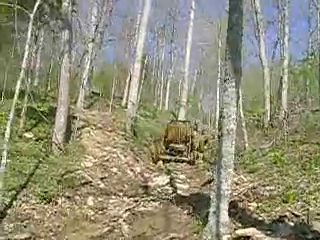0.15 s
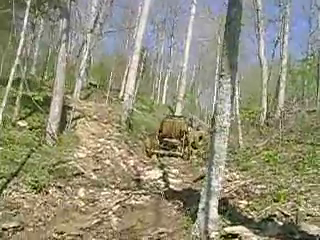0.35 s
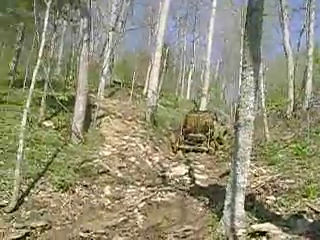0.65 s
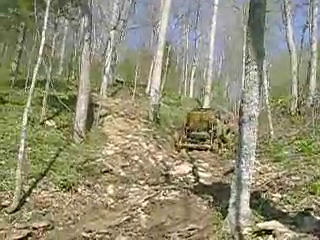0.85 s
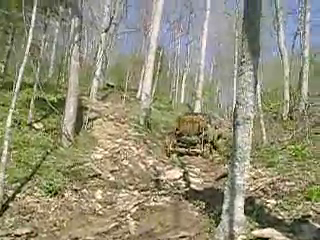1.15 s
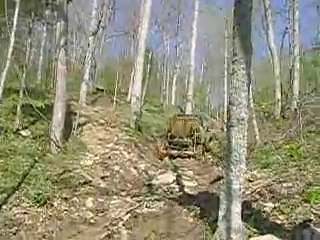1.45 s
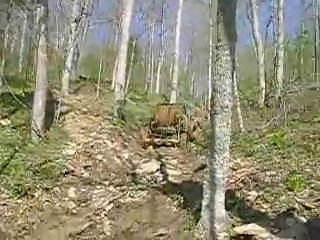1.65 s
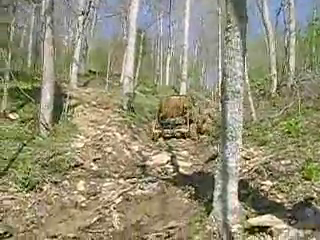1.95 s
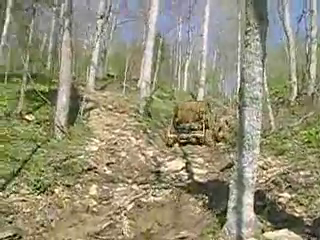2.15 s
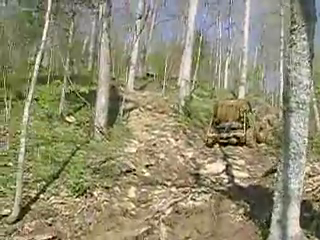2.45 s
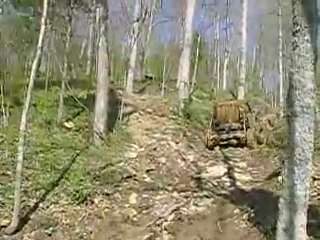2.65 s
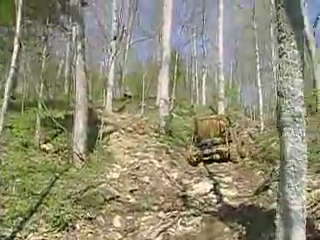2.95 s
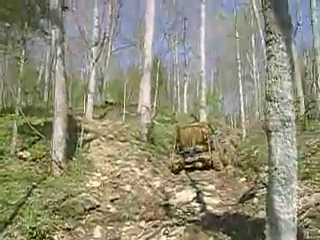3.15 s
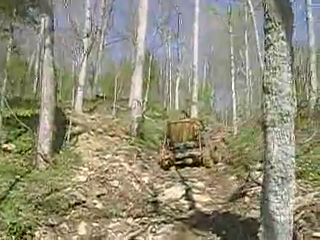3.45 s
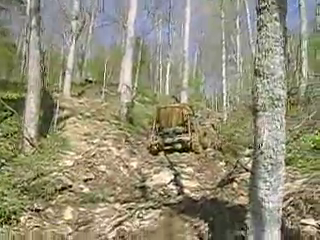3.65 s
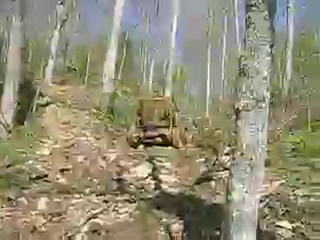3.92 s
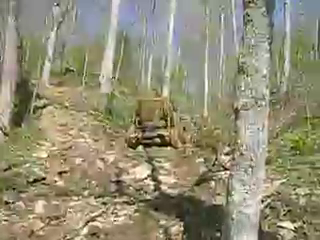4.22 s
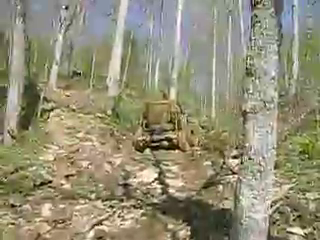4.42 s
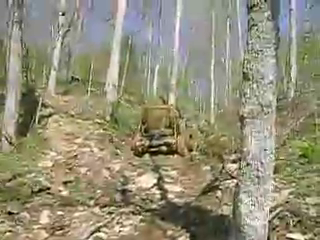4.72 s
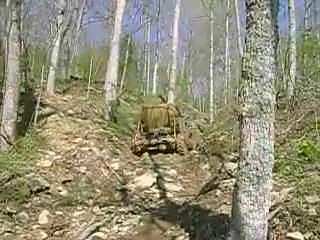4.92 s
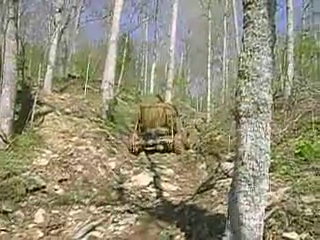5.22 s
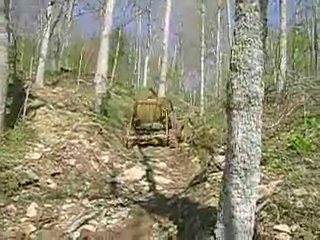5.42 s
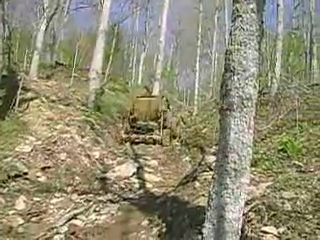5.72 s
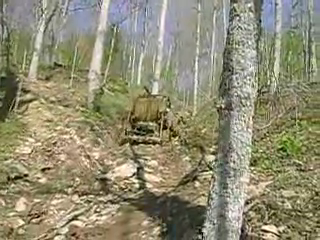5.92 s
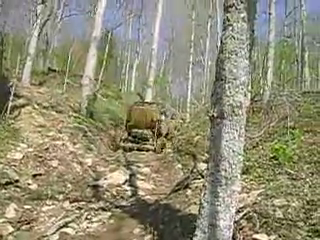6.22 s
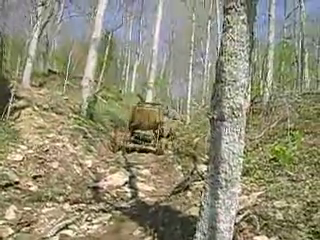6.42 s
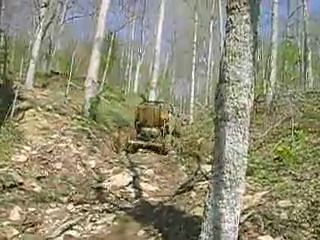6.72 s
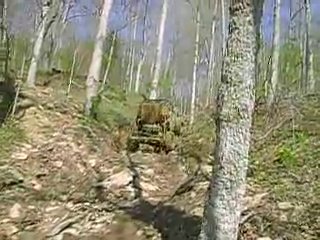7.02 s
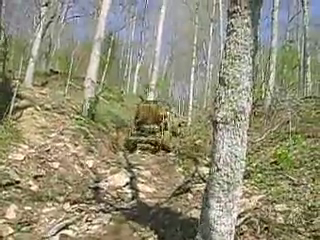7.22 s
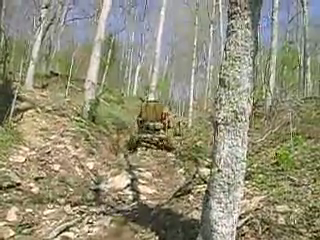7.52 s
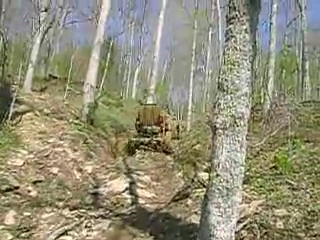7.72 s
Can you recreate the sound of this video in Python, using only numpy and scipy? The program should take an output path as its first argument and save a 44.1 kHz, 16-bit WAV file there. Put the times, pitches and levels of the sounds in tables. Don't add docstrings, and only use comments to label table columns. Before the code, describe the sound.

A small off-road engine on a rocky forest slope slows from a moderate putter to a weak, lumpy idle with a faint belt whistle. A sharp throttle blip comes with hard stone clacks and soft exhaust thumps. It chugs steadily under load, bogs, then climbs in surges to a loud flat-out roar. A cheap, dull mono microphone clips harshly at the end.

```python
import sys
import numpy as np
from scipy import signal
from scipy.fft import rfft, irfft, next_fast_len
from scipy.io import wavfile
from scipy.ndimage import uniform_filter1d

SR = 44100
rng = np.random.default_rng(int(sys.argv[2]) if len(sys.argv) > 2 else 0)


def voltage_ratio(level):
    return 10 ** (np.asarray(level, float) / 20)


def file_out(sig):
    cols = np.atleast_2d(sig).T
    lim = np.clip(cols, -1, 1)
    pcm = np.round(lim * 32767).astype(np.int16)
    wavfile.write(sys.argv[1], SR, pcm)


N = 347049

# (firing rate [Hz], upper orders over the gas [dB], firing unevenness [dB],
# half order [dB], orders one and two [dB])
BY_SPEED = [(30.3, -15, 3.5, -43, -12), (37.5, -9.5, 4, -40.5, -7), (46.2, -6.5, 3, -34, -0.3),
            (70, -2.5, 6.5, -35, -1.05), (86, 1.5, 3, -33.5, -2.2), (117.6, -0.5, -1.2, -44, 1.16),
            (160, 3.5, -1, -30.5, 2), (178, 5, -0.5, -30, 1), (189, -6, 1, -24.5, 0.8),
            (218, 0.5, 5.5, -10, 0.7)]


def rms_one(x):
    return x / np.sqrt(np.mean(x ** 2) + 1e-20)


def in_time(rows):
    s, *columns = np.transpose(rows)
    return [np.interp(np.arange(N) / SR, s, c) for c in columns]


def on_log(points, hz, axis=1):
    points = np.array(points)
    return np.interp(np.log(hz), np.log(points[:, 0]), points[:, axis])


def hump(middle_s, before_s, after_s):
    return np.interp(np.arange(N) / SR, [middle_s - before_s, middle_s, middle_s + after_s], [0, 1, 0])


def resonance(x, hz, width_hz):
    r = np.exp(-np.pi * width_hz / SR)
    b = np.array([1, 0, -1]) * (1 - r * r) / 2
    return signal.lfilter(b, [1, -2 * r * np.cos(2 * np.pi * hz / SR), r * r], x)


def narrow_noise(hz, width_hz, source, second_width_hz):
    return rms_one(resonance(resonance(source, hz, width_hz), hz, second_width_hz))


def coloured(x, points):
    size = next_fast_len(N)
    hz = np.maximum(np.arange(size // 2 + 1) * SR / size, 1)
    return irfft(rfft(x, size) * voltage_ratio(on_log(points, hz)), size)[:N]


def firing_rate():
    # (time [s], firing rate [Hz])
    speed = [(0, 64), (.39, 47.7), (1.0, 38.06), (1.6, 31.85), (2.23, 27.68), (2.51, 65.7), (2.65, 71.6),
             (3.45, 54.3), (3.95, 60.93), (4.8, 54.2), (5.14, 60.2), (5.72, 80.57), (6.13, 115.3),
             (6.42, 121.2), (6.8, 148.6), (7.2, 188.6), (7.62, 215.5), (7.87, 208.5)]
    # (slowest time [s], rate lost [Hz], sinking [s], recovering [s])
    bogs = [
        (3.611, 8.07, .14, 0.36),
        (5.499, 13.93, .36, .22),
        (5.87, 10.1, .15, 0.27),
        (6.52, 17.5, .1, .24),
        (7.44, 11, .24, .14),
    ]
    drag = sum(lost * hump(s, sinking_s, recovering_s) for s, lost, sinking_s, recovering_s in bogs)
    flywheel_s = .05
    return uniform_filter1d(in_time(speed)[0] - drag, size=round(flywheel_s * SR), mode="nearest")


def throttle_stabs():
    # (middle time [s], half length [s], extra gas [dB])
    stabs = [(0.126, 0.051, 2.5), (2.258, 0.006, 6.5), (2.295, 0.013, 3.5), (2.382, 0.13, 10.5),
             (3.519, .07, 5), (3.787, 0.26, 3), (5.475, 0.03, 1), (5.76, 0.073, 3), (5.872, 0.039, 3.5),
             (6.073, 0.11, 5.5), (6.288, 0.1, -2.5), (6.461, 0.049, 3.5), (6.571, 0.096, -0.5),
             (7.256, 0.17, 1.5), (7.573, 0.089, 4)]
    return sum(db * hump(s, half_s, half_s) for s, half_s, db in stabs)


def low_orders(rate, pressure_db):
    # (frequency [Hz], level [dB])
    part_flow = [(30, -13.5), (60, -13.5), (75, -4), (100, 0.5), (118, -2), (135, -5.5), (170, -9),
                 (215, -7.5)]
    full_flow = [(70, -7.5), (120, -2.5), (147, -6.5), (190, -1), (247, -14.5), (300, -12), (380, -27.5),
                 (450, -5)]
    # (time [s], half length [s], pressure [dB])
    misses = [
        (.97, 0.077, -5),
        (3.636, 0.014, -10.5),
        (4.66, 0.025, -4),
    ]
    pressure_db = pressure_db + sum(db * hump(s, half_s, half_s) for s, half_s, db in misses)
    opened = np.interp(rate, (64, 78), [0, 1])
    coasts_until_s = 0.86
    coasting = np.interp(np.arange(N) / SR, [coasts_until_s, coasts_until_s + .05], [1, 0])
    slow_db = on_log(BY_SPEED, rate, axis=4)
    trims_db = [3 + slow_db, 1.07 + slow_db, -3.5 - 6 * coasting]
    levels_db = []
    for k, trim_db in enumerate(trims_db, start=1):
        silencer_db = (1 - opened) * on_log(part_flow, k * rate) + opened * on_log(full_flow, k * rate)
        levels_db.append(pressure_db + trim_db + silencer_db)
    return levels_db


def upper_orders(rate, load, sway, uneven_db, smooth):
    # (frequency [Hz], part load [dB], full load [dB])
    exhaust = [(114.3, 11, 0), (203, 4, 1.5), (250, -3.5, -20), (362, -13, -12.5), (450, -1.5, -9.5),
               (568, -18, -14), (820, -22, -2), (975, -9.5, -4), (1300, -28, -7), (1670, -29, -28.5),
               (2610, -27, -46.5)]
    upper = 0
    for k in range(4, 16):
        level_db = (1 - load) * on_log(exhaust, k * rate) + load * on_log(exhaust, k * rate, axis=2)
        level_db = level_db + (1.3 - .7 * load) * uneven_db * smooth[k]
        upper = upper + voltage_ratio(level_db) * np.cos(2 * np.pi * (k * sway - 0.03103 * k * k))
    return upper


def gas_puffs(rate, turns, stab_db, flutter):
    crackle = 1 + 1.28 * stab_db
    since_s = (turns % 1) / rate
    rise = 1 - np.exp(-since_s / .003)
    gate = 1 + np.maximum(crackle, 0) * 0.84 * rise * np.exp(-since_s / 0.0049)
    gate = gate * voltage_ratio(flutter)
    return rng.standard_normal((3, N)) * gate / np.sqrt(uniform_filter1d(gate ** 2, size=4000))


def pipe_ring(stab_db):
    # (start [s], end [s], ring over its rest level [dB])
    pulls = [
        (0, .35, 8.5),
        (1.13, 1.776, 13),
        (2.45, 4.897, 19.5),
        (4.904, 5.247, 26.5),
        (5.253, 6.01, 12.5),
        (5.999, 7.873, 7.5),
    ]
    rest_db, ramp_s = -21, 0.098
    t = np.arange(N) / SR
    pull_db = sum(db * (t >= start) * (t < end) for start, end, db in pulls)
    return rest_db + uniform_filter1d(pull_db, size=round(ramp_s * SR), mode="nearest") + 0.2 * stab_db


def pipe(x):
    # (frequency [Hz], width [Hz], level [dB])
    modes = [(720, 70, -6), (930, 90, -4), (1290, 130, 0), (1620, 120, -8), (3200, 300, -17)]
    return sum((-1) ** k * voltage_ratio(db) * resonance(x, hz, width) for k, (hz, width, db) in enumerate(modes))


def gas_noise(puffs, load, ring_db, stab_db):
    # (frequency [Hz], level [dB per Hz])
    gas_spectrum = [(20, -37.5), (60, -10.5), (120, -3), (250, -17), (350, -14), (600, -13), (1200, -13),
                    (2200, -24), (3500, -26.5), (5600, -29.5)]
    piped_db = 0.5 + ring_db / 3 + 0.2 * stab_db
    gas = rms_one(coloured(puffs[0], gas_spectrum)) + rms_one(pipe(puffs[1])) * .6 * voltage_ratio(piped_db)
    rumble = signal.sosfiltfilt(signal.butter(2, 150, fs=SR, output="sos"), gas)
    return gas - 0.63 * load * rumble


def engine():
    # (time [s], firing pressure [dB], gas flow [dB])
    pedal = [(0, -11.5, -27.5), (.35, -12.5, -31.5), (.55, -22, -36), (1.0, -24, -35), (1.35, -21.5, -39.5),
             (2.225, -24, -30), (2.31, -7.5, -23.5), (2.45, -4, -22), (2.65, -14.5, -31), (5.08, -13, -34),
             (5.25, -2, -22.5), (5.55, 0.5, -9.5), (5.95, 2.5, -2.5), (6.22, 5.5, -3.5), (6.62, 4, -3.5),
             (6.88, 5.5, -1), (7.35, 6, -1), (7.87, 5, 1.5)]
    order_lags = [0.0, 0.308, 0.612]
    rate = firing_rate()
    pressure_db, flow_db = in_time(pedal)
    stab_db = throttle_stabs()
    upper_db, uneven_db, lope_db = (on_log(BY_SPEED, rate, axis=k) for k in range(1, 4))
    upper_db = upper_db + 0.3 * stab_db
    uneven_db = uneven_db + 0.2 * stab_db
    full_speed = np.interp(rate, (77, 137), [0, 1])
    wide_open = np.interp(flow_db, (-36.5, -16), [0, 0.27])
    load = np.maximum(full_speed, wide_open)

    turns = np.cumsum(rate) / SR
    turns = turns - turns[round(2.25 * SR)]
    cycle = np.floor(turns).astype(int) - int(np.floor(turns[0]))
    chance = np.clip(rng.standard_normal((1200, 16)), -1.7, 1.7)
    smooth = uniform_filter1d(chance[cycle].T, size=600, axis=1)
    sway = turns + .008 * smooth[1]

    orders_db = low_orders(rate, pressure_db)
    flutter_db = .3 * uneven_db * smooth[0]
    low = sum(voltage_ratio(db + flutter_db) * np.sqrt(2) * np.cos(2 * np.pi * k * (sway - lag))
              for k, (db, lag) in enumerate(zip(orders_db, order_lags), start=1))
    lope = voltage_ratio(lope_db + 2.2 * smooth[2]) * np.cos(np.pi * sway)
    half = voltage_ratio(orders_db[0]) * lope

    upper = upper_orders(rate, load, sway, uneven_db, smooth)
    ring_db = pipe_ring(stab_db)
    puffs = gas_puffs(rate, turns, stab_db, 0.25 * uneven_db * smooth[0])
    gas = gas_noise(puffs, load, ring_db, stab_db)
    ring = narrow_noise(446, 58, puffs[2], second_width_hz=116)
    roar = voltage_ratio(upper_db) * upper * (1 + 3.1 * lope)
    roar = roar + voltage_ratio(-1.03 - 3.5 * load) * gas
    roar = roar + voltage_ratio(ring_db + 2.5) * ring
    return voltage_ratio(flow_db + stab_db) * roar - low - half


def belt():
    # (time [s], level [dB])
    whistle = [
        (0, -64),
        (1.75, -90),
        (1.95, -48),
        (2.25, -46.5),
        (2.4, -59),
        (7.87, -68),
    ]
    noise = narrow_noise(3120, 270, rng.standard_normal(N), second_width_hz=270)
    return voltage_ratio(in_time(whistle)[0]) * noise


def blows(events, rise_s, noisy):
    out, t = np.zeros(N + SR), np.arange(SR // 4) / SR
    for s, db, hz, t60 in events:
        shape = (1 - np.exp(-t / rise_s)) * voltage_ratio(db - 60 * t / t60)
        rattle = rms_one(resonance(rng.standard_normal(len(t)), hz, .9 * hz))
        out[round(s * SR):][:len(t)] += shape * (np.sin(2 * np.pi * hz * t) + noisy * rattle)
    return out[:N]


def forest(x):
    dull = signal.sosfilt(signal.butter(1, 1500, fs=SR, output="sos"), x)
    echoes = [(.023, -1), (.061, -39), (.113, -16.5)]   # (delay [s], level [dB])
    return x + sum(voltage_ratio(db) * np.pad(dull, (int(s * SR), 0))[:N] for s, db in echoes)


def stone_knocks():
    # (time [s], peak [dB], pitch [Hz], t60 [s])
    stones = [(.1, -31.5, 1090, 0.14), (.14, -35.5, 1300, 0.1), (1.813, -25.5, 1580, 0.026),
              (2.677, -18, 720, 0.016), (2.362, -9.5, 1313, 0.078), (2.39, -7, 962, 0.09),
              (5.72, -8.5, 1680, 0.27), (3.105, -24.5, 1980, 0.025), (3.49, -23, 743, 0.18),
              (3.55, -25, 736, 0.16), (4.29, -30.5, 2095, .04)]
    return forest(blows(stones, rise_s=0.00051, noisy=0.76))


def stray_thumps():
    # (time [s], peak [dB], pitch [Hz])
    strays = [(1.001, -18, 96.5), (2.177, -13, 96.6), (2.249, -15, 95), (2.283, -4, 95.4), (2.631, -12, 97),
              (2.879, -10, 95), (3.098, -15, 92), (3.289, -10.5, 96), (4.04, -6.5, 91.9),
              (4.078, -15, 95.45), (4.67, -29, 95)]
    t60_s = 0.26
    return blows([(*row, t60_s) for row in strays], rise_s=0.0063, noisy=0.087)


def scene():
    return (engine() + belt() + stone_knocks() + stray_thumps())[None]


def band_limit(x):
    return signal.sosfilt(signal.butter(12, 16530, fs=SR, output="sos"), x)


def record(dry):
    step, top = 4, .69
    band = signal.sosfilt(signal.butter(4, 7000, fs=SR, output="sos"), dry - .012)
    held = np.clip(band[:, ::step], -top, top)
    taps = step * signal.firwin(129, SR / step / 2, window=("kaiser", 9.0), fs=SR)
    smooth = signal.upfirdn(taps, held, up=step)[:, 64:64 + N]
    mix = np.clip(smooth, -1.005 * top, 1.005 * top)
    return band_limit(mix)


dry = scene()
out = record(dry)
file_out(out)
```